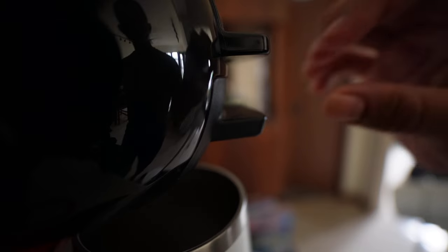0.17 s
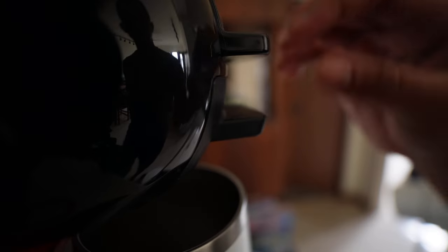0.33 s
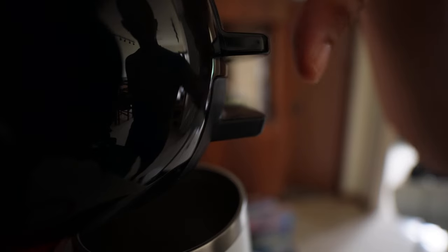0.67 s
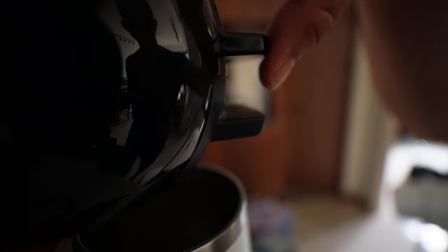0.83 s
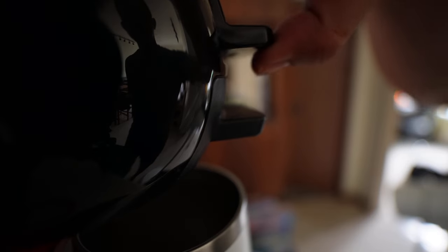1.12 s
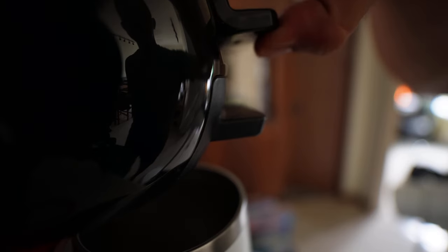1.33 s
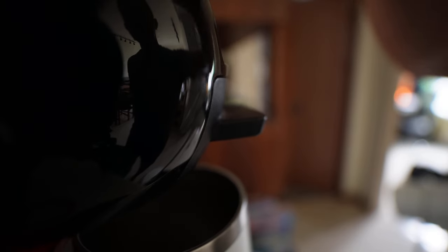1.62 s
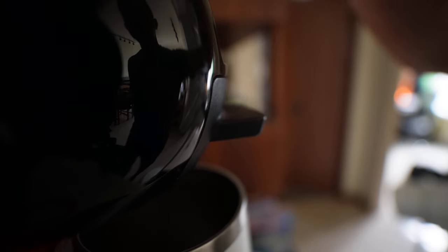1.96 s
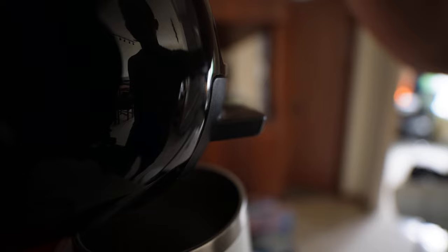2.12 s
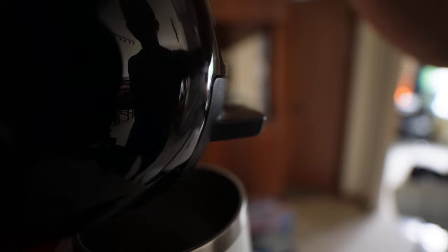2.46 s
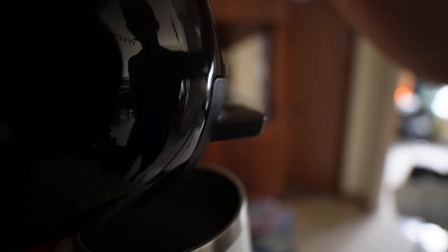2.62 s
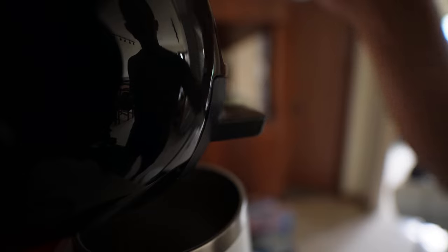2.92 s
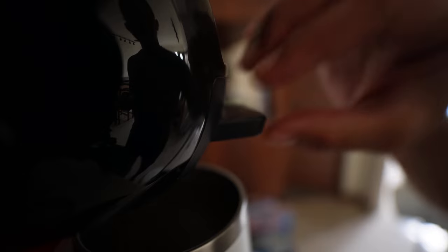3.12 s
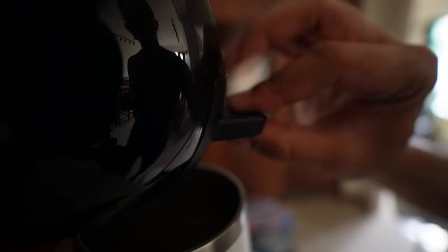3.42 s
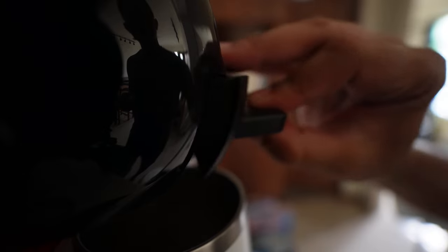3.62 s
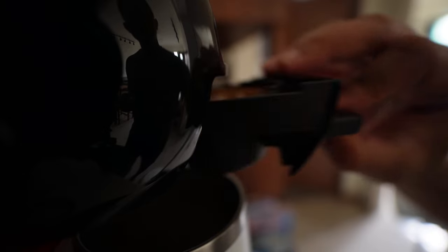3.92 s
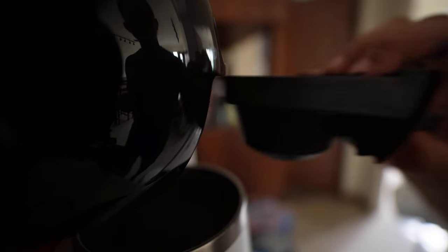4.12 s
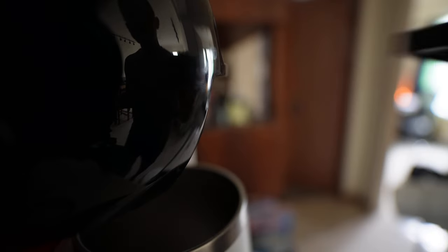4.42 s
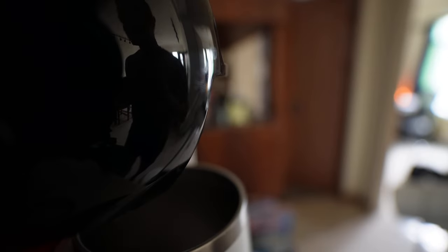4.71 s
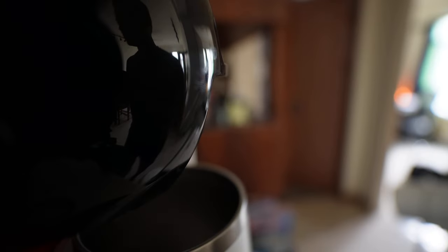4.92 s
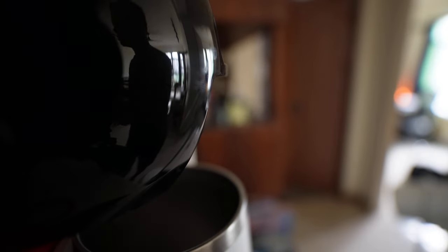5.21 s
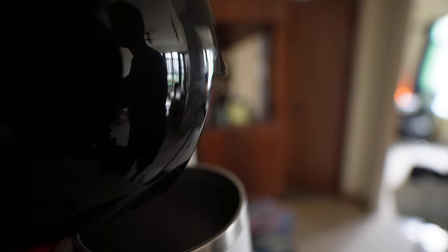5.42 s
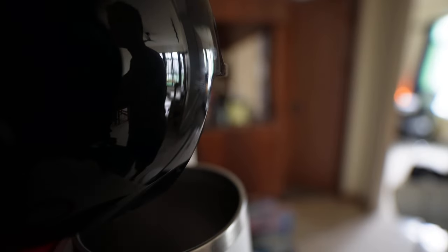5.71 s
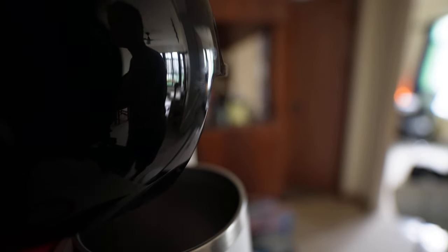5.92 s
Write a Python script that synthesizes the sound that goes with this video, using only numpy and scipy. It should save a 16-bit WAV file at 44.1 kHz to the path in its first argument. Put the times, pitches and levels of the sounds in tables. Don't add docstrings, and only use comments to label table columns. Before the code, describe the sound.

A quiet kitchen with low room hiss, a faint high electronic whine and tiny thin motor whistles beside the microphone. Barely audible finger touches at 0.4 and 0.55 s. From 0.85 s a stiff plastic lever close by gives rapid uneven clicks, the sharpest near 0.99 s, continuing densely to 1.5 s with hollow body knocks. At 1.59 s it snaps loose loudly and rattles until 1.75 s. A crisp click at 2.0 s precedes the loudest hard double clack at 2.2 s, with a short grinding edge. A near-silent gap, a faint tick at 2.57 s, then small clicks from 3.2 s and a soft dry rubbing slide from 3.55 to 3.95 s, ending in light hollow ticks at 4.03 and 4.16 s. A distant outdoor wash slowly rises. At 5.63 s a soft swish, then roomy farther knocks and granular rattle from 5.76 to 5.98 s.

```python
import sys
import numpy as np
from scipy import signal
from scipy.fft import rfft, irfft
from scipy.io import wavfile
from scipy.ndimage import uniform_filter1d

SR = 44100
rng = np.random.default_rng(int(sys.argv[2]) if len(sys.argv) > 2 else 0)


def boost_factor(decibels):
    exponent = np.asarray(decibels, float) / 20
    return 10 ** exponent


def generate_wav(signal):
    frames = np.transpose(np.atleast_2d(signal))
    scaled = np.clip(frames, -1, 1) * 32767
    pcm = np.round(scaled).astype(np.int16)
    wavfile.write(sys.argv[1], SR, pcm)


N = 267731
TIME = np.arange(N) / SR
SILENT_DB, ANY_HZ = -120, 1500

# (time [s], latch level [dB], latch pitch [Hz], crack level [dB], shell level [dB])
LIFT = [(0.8378, -41, 1520, -54, -48), (0.8933, -44.5, 1850, -47, -52), (0.9164, -55, 1700, -60, -40),
        (0.9494, -24.5, 1390, -27, -37), (0.9562, -23.5, 1350, -34, -20), (0.9822, -38, 4330, -23.5, -31),
        (0.987, -10.5, 2110, -16.5, -30), (1.0086, -16.5, 2020, -20.5, -33), (1.0444, -44, 1700, -58, -58),
        (1.07, -22, 1990, -34, -41), (1.095, -34, 1710, -38, -45), (1.1412, -28, 1600, -37, -30.5),
        (1.1535, -22.5, 1920, -40, -33), (1.1719, -21, 1690, -36, -29), (1.1794, -46, 4080, -35.5, -46),
        (1.2055, -13, 2090, -58, -20.5), (1.2163, -15.5, 2160, -52, -26), (1.2182, -21, 1860, -47, -23),
        (1.2338, -19, 1900, -30, -34), (1.2702, -35, 1420, -64, -55), (1.2891, -16.5, 2220, -28, -31)]
SWING = [(1.298, -26, 1860, -43, -46), (1.3023, -24.5, 3200, -26, -24), (1.306, -20, 1560, -32, -26.5),
         (1.33, -36, 2940, -40, -42), (1.3333, -27, 2270, -46, -24), (1.358, -25, 1750, -29.5, -18.5),
         (1.4063, -37, 1410, -68, -44), (1.4276, -23.5, 2400, -32.5, -19), (1.4374, -40, 1410, -59, -46),
         (1.4537, -25, 1840, -39, -22), (1.4616, -32, 1670, -62, -40), (1.4737, -54, 1410, -53, -45),
         (1.4845, -27.5, 1940, -62, -28)]
RELEASE = [(1.5263, -46, 3070, -68, -39), (1.5326, -31, 1460, -61, -46), (1.5435, -32, 2100, -58, -26),
           (1.5486, -20.5, 2290, -44, -22.5), (1.5536, -40, 4430, -36, -27),
           (1.5726, -50, 1410, -52, -24.5), (1.5773, -20, 1910, -30.5, -37),
           (1.5874, -6.5, 2350, -15, -7.5), (1.5906, -7, 1850, -21, -13.5), (1.5957, -18, 1580, -34, -25),
           (1.6005, -17, 1380, -34, -26.5), (1.6076, -13, 1380, -29, -22), (1.6112, -26, 1410, -27, -19.5),
           (1.6254, -21, 2430, -30, -30), (1.6431, -36, 1410, -55, -38), (1.6598, -40, 1930, -48, -33.5),
           (1.6734, -34, 1430, -54, -43), (1.6872, -38, 1970, -47, -37), (1.6991, -34, 2020, -50, -34),
           (1.7037, -18, 1560, -52, -24), (1.7076, -20, 1550, -42, -18), (1.7411, -16.5, 1570, -60, -25),
           (1.7554, -41, 1790, -58, -32.5)]
STOP = [(1.8294, -30, 2720, -58.5, -42), (1.834, -38, 2800, -53, -33.5), (1.9995, -22, 2600, -33, -35),
        (2.0244, -50, 2660, -44, -38), (2.029, -39, 1410, -45, -29), (2.0671, -34, 1584, -54, -34),
        (2.1223, -45.5, 1500, -68, -48), (2.1872, -36, 1500, -60, -33), (2.1929, -4, 1800, -15, -24),
        (2.1986, -10, 1740, -34.5, -16), (2.2016, -1, 2050, -11, -12), (2.2117, -13, 1740, -31, -35),
        (2.2175, -10, 1750, -27, -17.5)]
# (time [s], level [dB])
TOUCHES = [
    (.405, -51),
    (.557, -56),
]
# (time [s], level [dB])
THUDS = [(0.9494, -36), (1.1794, -38), (1.304, -24.5), (1.33, -23.5), (1.5536, -21), (1.6076, -19),
         (1.6431, -28), (1.6872, -29), (1.6991, -24.5), (2.1939, -22.5), (2.2117, -18)]
# (pitch [Hz], level [dB], t60 [s])
SHELL = [(626, 0.5, 0.035), (763, 2.5, 0.021), (866, -3.5, 0.032), (918, -8, 0.066), (978, -1, 0.035),
         (1173, 2, 0.018)]
# (pitch [Hz], level [dB], t60 [s])
HOUSING = [(249, -0.5, 0.075), (293.2, 1.5, 0.067), (360, 2, 0.05), (475, 4.5, 0.048)]


def lever():
    rows = linked(LIFT, under_db=-14) + linked(SWING, under_db=-11)
    rows += linked(RELEASE, under_db=-10.5) + linked(STOP, under_db=-11.5)
    rows += [(s, SILENT_DB, ANY_HZ, db, SILENT_DB, SILENT_DB) for s, db in TOUCHES]
    detents = blows(rows, SHELL, HOUSING, latch_t60=0.018, crack_t60=0.013, damping=0.27, firm=6.5)
    return detents + blows(dull(THUDS), SHELL, HOUSING)


# (top reached [s], level [dB], rise [s], fall [s], hold if any [s])
GRIND = [
    (1.595, -34.5, 0.016, 0.063),
    (1.703, -40, 0.01, .04),
    (2.2, -29, .006, .045),
]
# (frequency [Hz], density [dB per Hz])
HINGE = [(300, -23), (800, 1), (1800, 0.5), (3000, 2), (5000, -10), (9000, -27), (16000, -35)]


def grind():
    return coloured(HINGE, patchy_db=2) * flicker(3.5, width=60) * strokes(GRIND)


# (time [s], latch level [dB], latch pitch [Hz], crack level [dB], shell level [dB])
PULL = [(2.5672, -40, 1580, -54.5, -42.5), (3.2147, -34.5, 1800, -59, -34.5), (3.4018, -40, 2700, -66, -26),
        (3.4197, -17, 1820, -48, -33), (3.4235, -42, 1630, -34, -31), (3.439, -37, 2900, -54, -42),
        (3.5038, -54, 3200, -57, -60), (3.5437, -41, 1750, -63, -33.5), (3.573, -46, 1550, -54, -31),
        (3.5919, -43, 1670, -51, -36), (3.6237, -33.5, 1420, -52, -29), (3.6533, -49, 1930, -53, -43),
        (3.6681, -49, 1750, -65, -30.5), (3.7419, -37, 2650, -48, -42.5), (4.0306, -28, 2240, -43, -31),
        (4.1601, -28.5, 2580, -56, -26.5), (4.1638, -34, 1320, -57, -28), (4.1794, -42, 1410, -51, -40)]
# (time [s], level [dB])
CUP_THUDS = [
    (2.5672, -37),
    (3.4268, -36),
    (3.6681, -33),
    (4.0316, -32),
    (4.163, -31),
]
# (pitch [Hz], level [dB], t60 [s])
HOLDER_SHELL = [(576, -16, 0.062), (684, -2.5, 0.047), (782, -2, 0.041), (815, 5.5, 0.036),
                (1160, -6, 0.03)]
# (pitch [Hz], level [dB], t60 [s])
HOLDER_CUP = [(287, 4, 0.09), (361, -14, 0.099), (455, 2.5, 0.044)]


def holder():
    tugs = blows(linked(PULL, under_db=-9.5), HOLDER_SHELL, HOLDER_CUP,
                 latch_t60=0.023, crack_t60=0.018, damping=0.33, firm=5.0)
    return tugs + blows(dull(CUP_THUDS), HOLDER_SHELL, HOLDER_CUP)


# (time [s], level [dB])
SLIDE = [
    (3.53, -72),
    (3.6, -49),
    (3.736, -51),
    (3.866, -46),
    (3.95, -64),
]
# (pitch [Hz], width [Hz], level [dB])
RAILS = [(600, 240, 15.5), (850, 80, 12.5), (1125, 90, 4), (1710, 150, 7), (2750, 200, 5),
         (1500, 1300, -15)]
# (top reached [s], level [dB], rise [s], fall [s], hold if any [s])
SLIDE_HISS = [
    (3.59, -65, .04, .12, .04),
    (3.74, -62.5, 0.095, .2, .11),
]
# (frequency [Hz], density [dB per Hz])
RUB = [(2500, -16), (4000, 3), (6600, 0), (9000, -4.5), (13000, -9), (16000, -18)]


def slide():
    slips = rng.standard_normal(N) * flicker(3.5, width=120)
    rails = within(slips, SLIDE[0][0], SLIDE[-1][0], RAILS, widen=3)
    hiss = coloured(RUB, patchy_db=3.0) * strokes(SLIDE_HISS) * flicker(1.7, width=200)
    return boost_factor(-18) * rails * level(SLIDE) + hiss


# (time [s], pitch [Hz], level [dB], t60
# [s])
PINGS = [(.8937, 13000, -48, .008), (.9493, 9000, -31, .007), (.9493, 11800, -30, .007),
         (.9493, 14500, -36, .007), (.9565, 6500, -34, .009), (.9827, 10400, -25, .006),
         (.9835, 5300, -22, .008), (.9827, 14500, -27, .006), (.9828, 1900, -22, .008),
         (.9872, 13900, -22, .007), (.9872, 2700, -20, .01), (.9875, 1020, -24, .02),
         (1.0088, 12200, -23, .007), (1.0088, 5200, -24, .007), (1.0953, 12600, -42, .006),
         (1.1722, 3400, -32, .009), (1.2058, 3700, -24, .009), (1.2058, 6290, -32, .008),
         (1.2168, 3400, -22, .01), (1.2345, 3500, -25, .008), (1.2892, 14200, -36, .006),
         (1.2892, 1450, -26, .012), (1.3335, 1450, -28, .016), (1.4278, 4100, -30, .009),
         (1.454, 3000, -30, .01), (1.5488, 1450, -26, .015), (1.5876, 1220, -9, .022),
         (1.5876, 900, -12, .025), (1.5885, 1600, -14, .02), (1.6085, 1050, -18, .022),
         (1.7045, 3870, -28, .012), (1.7045, 1100, -20, .025), (1.7045, 1610, -14, .022),
         (1.7045, 12500, -44, .012),
         (1.9998, 2800, -7.5, .009), (2.0003, 1930, -15, .014), (1.9998, 7080, -29, .01),
              (1.9998, 5550, -31, .01), (1.9998, 4400, -28, .008), (1.9998, 9800, -32, .008),
              (1.9998, 13000, -38, .007), (2.1932, 5120, -12, .01), (2.1932, 4450, -17, .01),
              (2.1932, 3400, -17, .008), (2.1932, 930, -17, .014), (2.2018, 1060, -9, .011),
              (2.2018, 6820, -15, .007), (2.2018, 9720, -29, .006), (2.202, 2850, -6, .008),
              (2.202, 3800, -15, .008), (2.2125, 6000, -28, .012), (2.218, 3800, -24, .012),
              (2.2295, 13500, -36, .009), (2.2295, 9500, -36, .009), (2.2295, 15200, -40, .009),
              (2.2295, 7500, -38, .009)]
# (time [s], pitch [Hz], level [dB], t60 [s])
HOLDER_PINGS = [(3.2148, 3600, -48, .01), (3.2148, 5000, -52, .01), (3.402, 2750, -30, .012),
                (3.4035, 1150, -27, .025), (3.4238, 11000, -30, .008), (3.4238, 6000, -35, .008),
                (3.4238, 2700, -30, .012), (3.439, 4000, -41, .01), (3.6265, 520, -32, .06),
                (3.592, 620, -37, .04), (3.669, 800, -35, .035), (4.031, 867, -24, .025),
                (4.031, 4360, -37, .014), (4.031, 3100, -39, .018), (4.031, 1910, -39, .02),
                (4.031, 6400, -38, .01), (4.031, 5500, -43, .01), (4.1605, 3050, -37, .015),
                (4.1605, 4700, -46, .012), (4.1645, 2760, -33, .018), (4.1625, 1200, -28, .025),
                (4.1605, 2150, -36, .018), (4.18, 6600, -53, .012), (4.18, 2750, -47, .012)]


def pings():
    stiff_hz, stiff_law, rise_s = 3500, .4, .0004
    out, t = np.zeros(N), np.arange(1500) / SR
    rise = 1 - np.exp(-(t / rise_s) ** 2)
    for s, hz, db, t60 in PINGS + HOLDER_PINGS:
        short = min(1, (stiff_hz / hz) ** stiff_law)
        decay = boost_factor(db - 60 * t / t60 / short) / short
        out[round(s * SR):][:len(t)] += decay * np.sin(2 * np.pi * hz * t) * rise
    return out


# (top reached [s], level [dB], rise [s], fall [s], hold if any [s])
SHAKE = [
    (1.318, -53, .12, .15),
    (1.43, -46, .03, .12),
    (1.56, -54, .05, .05, .17),
    (1.78, -62, .05, .15, .27),
    (2.198, -55, .09, .42),
    (5.92, -50, .045, .4, .15),
]


def rumble():
    band = signal.butter(2, [28, 70], "band", fs=SR, output="sos")
    low = signal.sosfilt(band, rng.standard_normal(N))
    return evened(low) * strokes(SHAKE)


# (time [s], latch level [dB], latch pitch [Hz], crack level [dB], shell level [dB])
KNOCKS = [
    (5.7632, -30, 2020, -51, -31.5),
    (5.8202, -31, 2110, -55, -26),
    (5.8412, -18, 2000, -25, -17),
    (5.8542, -20, 1000, -67, -15.5),
    (5.8612, -25, 1050, -45, -22),
    (5.9012, -28, 1510, -43.5, -45),
    (5.9392, -39, 3400, -46, -49),
]
# (time [s], level [dB])
FAR_THUDS = [
    (5.8622, -21),
    (5.8532, -22),
    (5.9012, -21),
    (5.9392, -28.5),
    (5.9792, -30.5),
]
# (pitch [Hz], level [dB], t60 [s])
FAR_SHELL = [(823, -8.5, 0.065), (999, 3, 0.035), (1210, -11, 0.047), (1550, -4.5, 0.06),
             (2090, -2.5, 0.028), (3185, -14.5, 0.055)]
# (pitch [Hz], level [dB], t60 [s])
FAR_HOUSING = [(329, -1, 0.046), (422, 0.5, 0.061), (515, 13.5, 0.036), (588, -1.5, 0.095),
               (640, 11.5, 0.05)]


def far_knocks():
    rows = linked(KNOCKS, under_db=-6.5) + dull(FAR_THUDS)
    return blows(rows, FAR_SHELL, FAR_HOUSING, latch_t60=0.065, crack_t60=0.17, damping=0.36, firm=1)


# (top reached [s], level [dB], rise [s], fall [s], hold if any [s])
RATTLE = [
    (5.822, -41, .004, .03, .016),
    (5.844, -32, .004, .08, .012),
    (5.88, -44, .02, .04, .11),
]
# (pitch [Hz], width [Hz], level [dB])
BIN = [(700, 200, -2), (1000, 200, -3), (1520, 200, -11), (2100, 250, -3), (3140, 200, -10),
       (3950, 500, -2), (4600, 500, -4), (5400, 600, -16)]


def rattle():
    knocks = rng.standard_normal(N) * flicker(4.5, width=50)
    return boost_factor(-7) * within(knocks, 5.8, N / SR, BIN, widen=3) * strokes(RATTLE)


# (top reached [s], level [dB], rise [s], fall [s], hold if any [s])
SWISH = [
    (5.635, -43.5, 0.028, .28, .05),
    (5.86, -42, .03, 0.08),
]
# (frequency [Hz], density [dB per Hz])
SWISH_COLOUR = [(530, -33), (900, -6), (1750, 0), (2730, -2.5), (5410, -4), (7580, -2), (13200, -19),
                (16000, -31)]


def swish():
    return coloured(SWISH_COLOUR, patchy_db=0.0) * strokes(SWISH)


# (frequency [Hz], level [dB])
CRACK = [(1200, -25.5), (2500, 5.5), (4500, -2), (6800, -5), (9000, -13), (12000, -17), (15500, -19),
         (17000, -54.5)]
# (pitch [Hz], level [dB], t60 [s])
COUNTER = [(44.7, -30, 0.22), (77.4, -14, 0.044), (137, -14.5, 0.067)]


def blows(rows, shell, housing, latch_t60=1, crack_t60=1, damping=1, firm=1):
    out, t = np.zeros(N + SR), np.arange(4500) / SR
    grid_hz = np.linspace(0, SR / 2, 129)
    bright = signal.minimum_phase(signal.firwin2(255, grid_hz, boost_factor(2 * read(CRACK, grid_hz)), fs=SR))
    chances = rng.standard_normal((len(rows), 2100))
    for (s, latch_db, hz, crack_db, shell_db, housing_db), c in zip(rows, chances):
        y = boost_factor(shell_db) * ring(shell, t, c[-12:], scatter_db=2.5, rise_s=0.00059)
        y += boost_factor(housing_db) * ring(housing, t, c[-18:], scatter_db=2.5, rise_s=0.002)
        y += boost_factor(1.323 * housing_db - 7) * ring(COUNTER, t, c[-24:], scatter_db=7, rise_s=0.0021)
        if crack_db > SILENT_DB:
            latch = resonate(chatter(c[:2000], latch_t60, firm), hz, damping * hz)
            latch = resonate(latch, hz * 0.96, 1.4 * hz)
            latch = resonate(latch, hz * 0.92, 1.4 * hz)
            crack = signal.lfilter(bright, 1, chatter(c[:2000], crack_t60, firm))
            crack = crack - .35 * np.roll(crack, 7 + int(9 * abs(c[-30])))
            y[:2000] += boost_factor(latch_db) * peaked(latch) + boost_factor(crack_db + 5.5) * peaked(crack)
        out[round(s * SR):][:len(y)] += y
    return out[:N]


def chatter(chance, t60, firm):
    n = np.arange(len(chance))
    touch = 26
    lead_in = .5 * (n / touch) ** 2
    shape = np.where(n < touch, lead_in, boost_factor(-60 * (n - touch) / SR / t60))
    z = rfft((chance + firm * (n == touch)) * shape)
    even = irfft(z / np.sqrt(uniform_filter1d(abs(z) ** 2, size=24)))
    return even * np.minimum(n / 12, 1) * np.cos(np.pi / 2 * n / len(n)) ** 4


def ring(modes, t, chance, scatter_db, rise_s):
    hz, db, t60 = np.transpose(modes)[:, :, None]
    c = np.clip(chance[:len(hz), None], -2, 2)
    detuned = hz * (1 + 0.028 * c[::-1])
    waves = boost_factor(db + scatter_db * c - 60 * t / t60) * np.sin(2 * np.pi * detuned * t)
    return peaked((np.sign(c[::-1]) * waves).sum(0) * (1 - np.exp(-t / rise_s)))


def linked(rows, under_db):
    return [(*row, row[-1] + under_db) for row in rows]


def dull(rows):
    return [(s, SILENT_DB, ANY_HZ, SILENT_DB, SILENT_DB, db) for s, db in rows]


def resonate(x, hz, width):
    r = np.exp(-np.pi * width / SR)
    return 2 * signal.lfilter([1 - r], [1, -r * np.exp(2j * np.pi * hz / SR)], x).real


def within(x, from_s, to_s, peaks, widen):
    out, span = np.zeros(N), slice(round(from_s * SR), round(to_s * SR))
    for hz, width, db in peaks:
        once = resonate(x[span], hz, width)
        out[span] += boost_factor(db) * evened(resonate(once, hz, widen * width))
    return out


def strokes(rows):
    gain = np.zeros(N)
    for s, db, rise, fall, *hold in rows:
        before = (s - TIME) / abs(rise)
        after = (TIME - s - sum(hold)) / abs(fall)
        gain += boost_factor(db - 20 * np.maximum(np.maximum(before, after), 0))
    return gain


def level(rows):
    s, db = np.transpose(rows)[[0, -1]]
    return boost_factor(np.interp(TIME, s, db, -200, -200))


def flicker(depth_db, width):
    slow = uniform_filter1d(rng.standard_normal(N), size=width)
    return boost_factor(depth_db * evened(uniform_filter1d(slow, size=width)))


def coloured(points, patchy_db):
    a, b, patches = rng.standard_normal((N // 256 + 5, 513, 3)).T
    patches = uniform_filter1d(patches, size=12, axis=0)
    patches = evened(uniform_filter1d(patches, size=10, axis=1))
    colour_db = read(points, np.fft.rfftfreq(1024, 1 / SR))[:, None]
    z = (a + 1j * b) * boost_factor(colour_db + patchy_db * patches)
    return evened(signal.istft(z, nperseg=1024, noverlap=768)[1][:N])


def read(points, hz):
    f, value = np.transpose(points)
    return np.interp(np.log(hz + 1), np.log(f + 1), value)


def evened(x):
    return x / np.sqrt(np.mean(x ** 2) + 1e-20)


def peaked(x):
    return x / abs(x).max()


# (frequency [Hz], t60 [s])
KITCHEN = [(100, 0.76), (500, 0.75), (2000, 0.56), (6000, 0.7), (14000, 0.42)]
# (frequency [Hz], level [dB])
ROOM_COLOUR = [(300, 0.5), (1300, 0.5), (2000, -3.5), (2800, 0), (4000, 2.5), (9000, 1.5), (15000, 0)]


def kitchen(x, gap_s):
    out, at, tails = np.zeros(N), np.arange(0, SR - 20, 20), 3
    for k in range(tails):
        taps = np.zeros(SR)
        taps[at + rng.integers(0, 20, len(at))] = rng.choice([-1., 1.], len(at))
        taps *= np.clip(np.arange(SR) / SR / gap_s - 1, 0, 1)
        hz, t, z = signal.stft(taps, SR, nperseg=256)
        fade_db = read(ROOM_COLOUR, hz)[:, None] - 60 * t / read(KITCHEN, hz)[:, None]
        tail = signal.istft(z * boost_factor(fade_db), SR, nperseg=256)[1]
        share = np.sqrt(2 / tails) * np.cos(np.pi * (TIME / .025 - k / tails))
        out += signal.fftconvolve(x * share, tail / np.linalg.norm(tail))[:N]
    return out


# (pitch [Hz], width [Hz], level [dB])
SUPPLY = (14940, 90, -89)
# (pitch [Hz], width [Hz], level [dB])
MOTOR = [(7990, 80, -3), (7250, 100, -9), (9000, 3500, 0), (14700, 200, -9), (12100, 100, -12),
         (13000, 110, -5), (13350, 90, -6), (13700, 80, 0)]
# (top reached [s], level [dB], rise [s], fall [s], hold if any [s])
MOTOR_RUNS = [
    (1.73, -70, .035, 0.33),
    (4.0, -79, .12, .2, .3),
]
# (start [s], length [s], from pitch [Hz], to pitch [Hz], level [dB])
ARCS = [(.69, .085, 12024, 12173, -77), (.66, .11, 8600, 10200, -84), (.9, .054, 12100, 12100, -72),
        (.903, .05, 11600, 11800, -68), (.9, .05, 9600, 9500, -86), (4.18, 0.23, 11200, 9200, -75)]
# (start [s], length [s], from pitch [Hz], to pitch [Hz], level [dB])
GLIDES = [(.81, .045, 12500, 14500, -80), (4.3, .12, 14400, 12300, -84), (.7, .04, 12400, 14100, -82),
          (.77, .09, 8100, 9100, -84), (.86, .06, 8500, 10100, -82), (.855, .05, 11600, 12500, -84),
          (.81, .03, 10100, 10900, -85), (4.415, .04, 12300, 12700, -84), (4.08, .1, 9900, 11300, -86)]


def camera():
    noise = rng.standard_normal(N)
    hz, width, db = SUPPLY
    supply = boost_factor(db) * evened(resonate(resonate(noise, hz, width), hz, width))
    motor = sum(within(noise, s - .2, s + .6, MOTOR, widen=1) for s, *_ in MOTOR_RUNS)
    motor = motor * flicker(2.5, width=400) * strokes(MOTOR_RUNS)
    tones = whistles(ARCS, arch=.1) + whistles(GLIDES, arch=0)
    return supply + motor + tones * flicker(3.5, width=250)


def whistles(rows, arch):
    out, ends_db = np.zeros(N), -15
    for s, length, from_hz, to_hz, db in rows:
        u = np.arange(0, 1, 1 / SR / length)
        bow = 4 * u * (1 - u)
        hz = (from_hz + (to_hz - from_hz) * u) * (1 + arch * bow)
        tone = np.sqrt(2) * np.sin(2 * np.pi * np.cumsum(hz) / SR)
        out[round(s * SR):][:len(u)] += boost_factor(db + ends_db * (1 - bow)) * tone
    return out


# (frequency [Hz], density [dB per Hz])
AIR = [(20, 1), (65, -10.5), (110, -3.5), (450, -4.5), (1500, -8), (2200, -15), (2700, -11.5), (3200, -22),
       (4500, -27), (8500, -30), (11000, -37), (16000, -41)]
# (frequency [Hz], density [dB per Hz])
STREET = [(71, -39), (155, -1.5), (368, -5), (474, -3), (814, -9), (2630, -13), (9000, -34.5), (12500, -85)]
# (time [s], level [dB])
STREET_LEVEL = [
    (0, -69),
    (2.6, -73),
    (3.3, -60),
    (4.6, -58),
    (5.6, -53.5),
    (6.07, -46.5),
]


def background():
    room = coloured(AIR, patchy_db=.5) * boost_factor(-55)
    return room + coloured(STREET, patchy_db=1) * level(STREET_LEVEL)


def scene():
    near = lever() + holder() + slide() + grind()
    rings = pings()
    far = far_knocks() + rattle()
    wet = boost_factor(-21) * kitchen(near + boost_factor(-5) * rings, gap_s=0.007)
    wet += boost_factor(-8.0) * kitchen(far, gap_s=0.0054)
    mix = near + rings + boost_factor(-2.5) * far + swish() + wet + rumble() + background() + camera()
    return mix[None]


def roll_off(x):
    return signal.sosfilt(signal.butter(12, 16800, fs=SR, output="sos"), x)


def record(dry):
    ceiling = .95
    limited = ceiling * np.tanh(dry / ceiling)
    edge = signal.butter(14, 15950, fs=SR, output="sos")
    return roll_off(signal.sosfilt(edge, limited))


dry = scene()
out = record(dry)
generate_wav(out)
```